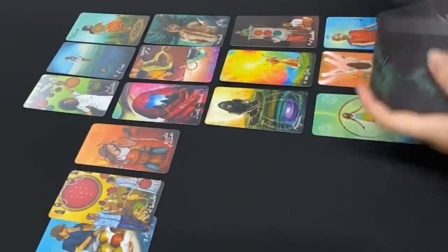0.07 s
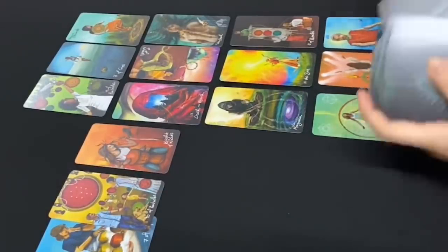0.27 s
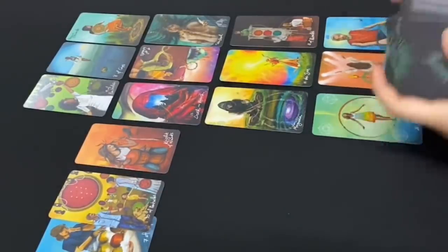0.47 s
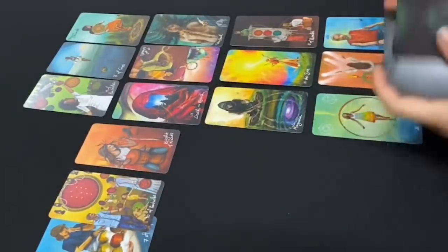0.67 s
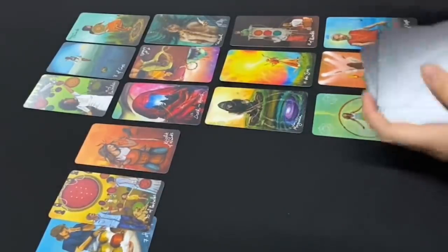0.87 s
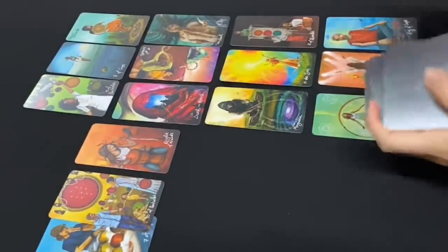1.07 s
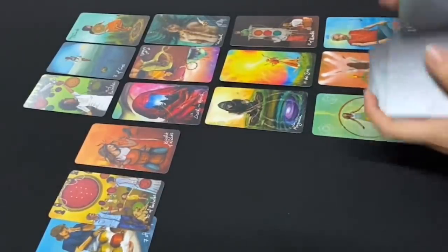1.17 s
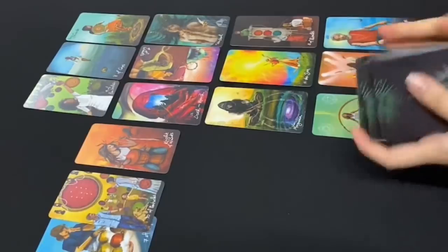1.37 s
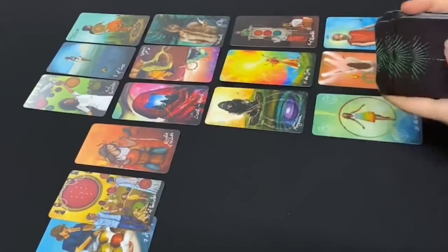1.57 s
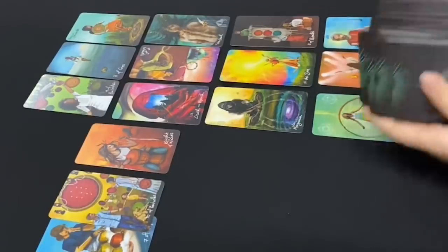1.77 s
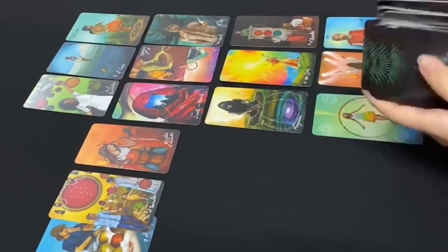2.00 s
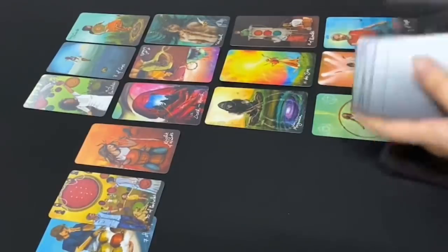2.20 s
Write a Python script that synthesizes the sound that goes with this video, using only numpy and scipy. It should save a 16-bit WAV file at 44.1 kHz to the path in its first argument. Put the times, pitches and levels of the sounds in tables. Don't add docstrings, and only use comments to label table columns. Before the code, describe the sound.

Close phone pickup of overhand card shuffling in a small quiet room: light hissing and ticks first, a sharp clustered crack at one second, softer rustling, then a woody pack thud and bright snaps.

```python
import sys
import numpy as np
from scipy import signal
from scipy.fft import rfft, irfft
from scipy.io import wavfile
from scipy.ndimage import uniform_filter1d

SR = 44100
rng = np.random.default_rng(int(sys.argv[2]) if len(sys.argv) > 2 else 0)


def ratio(d):
    e = np.asarray(d, float) / 20
    return 10 ** e


def unload_wav(signal):
    wavfile.write(
        sys.argv[1],
        SR,
        np.round(np.clip(np.atleast_2d(signal).T, -1, 1) * 32767).astype(np.int16),
    )


N = 98739

# f/Hz, level/dB
UPPER = [(6500, -35.5), (8000, -5.5), (9500, -3), (12500, 4), (15500, 2), (16300, -18)]
# f/Hz, level/dB
EDGE = [(700, -28), (1500, -12.5), (2600, -0.5), (4000, -3), (7000, -7), (9500, -17), (15500, -31.5)]


def evened(x):
    return x / np.sqrt(np.mean(x ** 2) + 1e-20)


def peaked(x):
    return x / abs(x).max()


def read(points, hz):
    f, value = np.transpose(points)
    return np.interp(np.log(hz + 1), np.log(f + 1), value)


def add(mix, s, sound):
    part = mix[round(s * SR):][:len(sound)]
    part += sound[:len(part)]


def tint(x, colour):
    return irfft(rfft(x) * ratio(read(colour, np.fft.rfftfreq(len(x), 1 / SR))), n=len(x))


def resonate(x, hz, width):
    turn = np.exp(2j * np.pi * hz * np.arange(len(x)) / SR)
    r = np.exp(-np.pi * width / SR)
    baseband = signal.lfilter([1 - r], [1, -r], x / turn)
    return 2 * (turn * baseband).real


def hiss(colour, patch_db):
    frames, hz = N // 128 + 5, np.fft.rfftfreq(512, 1 / SR)
    real, imag, patch = rng.standard_normal((frames, 257, 3)).T
    patch = uniform_filter1d(patch, size=8, axis=0)
    patch = evened(uniform_filter1d(patch, size=5, axis=1))
    z = (real + 1j * imag) * ratio(read(colour, hz)[:, None] + patch_db * patch)
    return evened(signal.istft(z, nperseg=512, noverlap=384)[1][:N])


def strokes(rows):
    slope_db, bend, grit_db = 20.5, 1.23, 2
    t, power = np.arange(N) / SR, np.zeros((2, N))
    for peak, rise, fall, db, second_db in rows:
        away = np.where(t < peak, (peak - t) / rise, (t - peak) / fall)
        drop = np.minimum(slope_db * away ** bend, 120)
        levels = np.array([[db], [db + second_db]])
        power += ratio(2 * (levels - drop))
    grit = evened(uniform_filter1d(rng.standard_normal(N), size=90))
    return np.sqrt(power) * ratio(grit_db * np.tanh(grit))


def slides():
    # peak t/s, rise/s, fall/s, level/dB, lower hiss relative level/dB
    glides = [(.04, 0.057, 0.026, -55, 7.5), (.095, 0.063, 0.048, -44.5, -3), (.2, 0.05, 0.021, -57, -2.5),
              (.243, 0.048, 0.046, -55, 5.5), (.31, 0.035, 0.14, -50, -2), (.366, 0.011, 0.051, -45.5, -4),
              (.462, 0.036, 0.021, -58.5, 1.5), (.53, 0.019, 0.014, -49, 6), (.6, 0.047, 0.032, -41, 0),
              (.78, 0.012, 0.071, -52, 2), (.81, 0.027, 0.03, -49, 2), (.846, 0.04, .04, -45.5, 5.5),
              (1.057, 0.017, 0.018, -39, 1.5), (1.29, 0.073, 0.074, -63, 4.5),
              (1.415, 0.033, 0.033, -58.5, 0.5), (1.56, 0.055, 0.058, -57, -0.5),
              (1.635, 0.11, 0.06, -52, -2), (1.745, 0.025, 0.064, -48, 2.5), (1.8, 0.046, 0.052, -48.5, -2),
              (1.893, 0.0095, 0.036, -48, 6), (2.012, 0.016, 0.023, -52.5, -5.5),
              (2.1, 0.047, 0.075, -54, 2), (2.14, 0.028, 0.15, -55.5, 6.5),
              (2.176, 0.017, 0.12, -49.5, 3.5)]
    # f/Hz, level/dB
    low_colour = [(2000, -28.5), (4400, -11), (5000, 1), (6800, 5.5), (8200, -0.5), (9500, -21.5)]
    upper, lower = strokes(glides)
    return upper * hiss(UPPER, 2.5) + lower * hiss(low_colour, 2.5)


def scrapes():
    # peak t/s, rise/s, fall/s, level/dB, dull part relative level/dB
    drags = [(.01, 0.067, 0.079, -60.5, -8), (.525, 0.022, 0.15, -49.5, -27),
             (.175, .03, 0.044, -77.5, 11.5), (.24, 0.046, 0.11, -67.5, -4),
             (.405, 0.019, 0.075, -75, 15.5), (.835, 0.042, 0.052, -46, -7.5),
             (.868, 0.024, 0.086, -70.5, 14), (1.034, 0.0034, .03, -65, 1), (1.058, 0.02, 0.009, -38, -2.5),
             (1.09, 0.034, 0.05, -43, -2.5), (1.3, 0.14, 0.064, -70, -19), (1.42, 0.059, 0.051, -69, -17),
             (1.485, 0.015, 0.02, -71, -2), (1.56, 0.088, 0.037, -68, -4), (1.8, 0.057, 0.019, -47, -22),
             (1.86, 0.061, 0.096, -46.5, -5), (2.062, 0.0055, 0.0079, -53.5, 17.5),
             (2.095, 0.052, 0.14, -54.5, 4), (2.14, 0.032, 0.068, -57, -8),
             (2.176, 0.0077, 0.026, -44, 2.5), (2.21, 0.023, 0.023, -40, -6)]
    dull_colour = [(150, -4), (500, 0.0), (1400, -4.5), (2500, -8.5), (6000, -36)]  # f/Hz, level/dB
    edge, dull = strokes(drags)
    return edge * hiss(EDGE, 2.2) + dull * hiss(dull_colour, 1.0)


def flicks():
    # t/s, peak level/dB, ring f/Hz, treble relative level/dB
    snaps = [(.172, -66, 1500, -20), (.229, -54, 2050, -10), (.239, -56, 1400, -20), (.243, -53, 2100, -20),
             (.263, -57.5, 1400, -20), (0.3201, -49, 5200, -8), (.321, -61, 1800, -20),
             (0.399, -51.5, 2100, -29), (0.4002, -45.5, 4700, -16), (.415, -62, 3000, -20),
             (0.5117, -30, 2700, -38), (.516, -38, 2400, -28), (0.6219, -41.5, 2050, -5),
             (.808, -35, 6700, -16), (.8206, -21, 5680, -39), (0.8208, -29, 2800, -30),
             (0.824, -30.5, 2700, -27), (0.8603, -28.5, 3030, -27), (0.86, -24.5, 6200, -18),
             (0.8613, -28.5, 1600, -37), (.866, -35, 1390, -30), (1.032, -40.5, 6220, -24),
             (1.045, -32, 5000, -21), (1.0493, -19.5, 6900, -17), (1.0528, -21, 2600, -33),
             (1.062, -31, 4800, -5), (1.063, -20.5, 2200, -17), (1.0725, -23.5, 7200, -12.5),
             (1.0738, -22.5, 5100, -20), (1.0787, -32, 3500, 6), (1.0817, -19, 2390, -36),
             (1.0815, -27.5, 6800, -20), (1.0944, -33, 2730, -1), (1.111, -32.5, 2700, -17),
             (1.484, -59, 2700, -31), (1.557, -65, 2300, -30), (1.815, -37, 7340, 11.5),
             (1.839, -17.5, 4860, -14), (1.8399, -22, 1493, -31), (1.869, -30, 3700, -25),
             (2.0621, -32.5, 1700, -21), (2.0757, -26, 6500, -21), (2.075, -28.5, 2480, -24),
             (2.0885, -27.5, 7000, 1.5), (2.092, -31, 1610, -25), (2.1315, -37, 2080, -34),
             (2.1833, -22, 6200, 2), (2.1881, -22, 7600, 7.5), (2.2085, -32.5, 3400, 0),
             (2.2163, -31, 7400, -8)]
    snap_s, ring_share, broad_db = 0.00053, 0.35, -3
    lead = 64
    out, t = np.zeros(N), np.arange(-lead, 448).clip(0) / SR
    bursts = rng.standard_normal((len(snaps), 3, 512)) * t * np.exp(-t / snap_s)
    for (s, db, hz, top_db), (a, b, c) in zip(snaps, bursts):
        width = hz * ring_share
        ring = peaked(resonate(resonate(a, hz, width), hz, width))
        broad = ratio(broad_db) * peaked(tint(b, EDGE))
        treble = ratio(top_db - 7.0) * peaked(tint(c, UPPER))
        add(out, s - lead / SR, ratio(db) * (ring + broad + treble))
    return out


def impacts(rows, rise, slap_db):
    out, t = np.zeros(N), np.arange(SR // 3) / SR
    for s, db, hz, t60 in rows:
        slap = np.sin(2 * np.pi * 2.15 * hz * t) + 2.8 * np.sin(2 * np.pi * 3.5 * hz * t)
        ring = np.sin(2 * np.pi * hz * t) * ratio(-60 * (t / t60) ** 0.9)
        ring += ratio(slap_db - 60 * t / 0.013) * slap
        onset = np.sin(np.pi / 2 * np.minimum(t * abs(hz) / rise, 1)) ** 2
        add(out, s, ratio(db) * onset * ring)
    return out


def cracks():
    # t/s, peak level/dB, ring f/Hz, t60/s
    hits = [(.5127, -25.5, 2720, 0.011), (.8208, -20, 2780, 0.0032), (.8606, -17, 3140, 0.0028),
            (1.0486, -4.5, 3560, 0.0032), (1.0488, -18.5, 5480, 0.0092), (1.0489, -13.5, 1700, 0.0063),
            (1.8378, -22.5, 3040, 0.0055), (2.0835, -30, 2280, .008), (1.0815, -19, 3500, 0.002),
            (1.0486, -11.5, 4470, 0.0054), (2.0752, -21.5, 6560, 0.0057), (2.1832, -19, 1684, 0.016),
            (2.2028, -33, 1960, 0.0042), (2.2122, -26, 1500, 0.0046), (2.2165, -20, 955, 0.0065)]
    return impacts(hits, 0.59, -66.5)


def knocks():
    # t/s, peak level/dB, ring f/Hz,
    # t60/s
    hits = [(.3992, -38.5, 830, 0.022), (.6175, -47, 456, 0.041), (.617, -41.5, 627, 0.021),
            (.622, -44.5, 976, 0.03), (.821, -42.5, 520, 0.059), (.826, -41, 664, 0.03),
            (.861, -45, 642, 0.09), (.866, -41, 446, 0.024), (1.083, -38, 833, 0.015),
            (1.786, -42.5, 590, 0.035), (1.799, -46.5, 628, 0.066), (1.838, -33.5, 522, 0.041),
            (1.839, -46, 215, 0.13), (1.999, -26.5, 280, 0.01), (2.0027, -13.5, 412, 0.017),
            (2.0078, -18.5, 320, 0.029), (2.0052, -18.5, 440, 0.012), (2.0093, -23, 1530, 0.0056),
            (2.0155, -30, 1650, 0.0073), (2.0195, -46, 1740, 0.0073), (2.0118, -20.5, 330, 0.03),
            (2.0155, -6.5, 429, 0.012), (2.0215, -15.5, 281, 0.046), (2.0243, -11, 492, 0.022),
            (2.0266, -6.5, 432, 0.01), (2.183, -19.5, 350, 0.011), (2.1834, -22.5, 960, 0.021),
            (2.1935, -25, 164, 0.058), (2.1985, -22.5, 134, 0.035), (2.203, -20.5, 372, 0.0071),
            (2.212, -29, 466, 0.023)]
    return tint(impacts(hits, 0.22, -25.0), [(1900, 2), (2600, -5), (5000, -24)])


def thumps():
    # t/s, peak level/dB, f/Hz, t60/s
    pulses = [
        (.93, -27, 19, 0.15),
        (1.082, -26, 69, 0.03),
        (1.086, -22, -9, 0.28),
        (2.003, -27.5, 207, 0.14),
        (2.004, -44, 26, 0.65),
        (2.025, -30.5, 93.5, 0.46),
        (2.187, -34, 30, 0.5),
        (2.192, -28, 98.5, 0.4),
        (2.06, -34, 92, 0.22),
    ]
    return impacts(pulses, 0.6, -27.0)


def room(x):
    # f/Hz, t60/s
    decay = [(200, 0.1), (3000, 0.23), (8000, 0.17), (14000, 0.18)]
    turns_per_s = 110
    taps = np.zeros((3, SR // 2))
    at = np.arange(80, SR // 2 - 20, 20)
    places = at + rng.integers(0, 20, (3, len(at)))
    np.put_along_axis(taps, places, rng.choice([-1., 1.], (3, len(at))), 1)
    hz, t, z = signal.stft(taps, SR, nperseg=256)
    z = z * ratio(-60 * t / read(decay, hz)[:, None])
    tail = signal.istft(z, SR, nperseg=256)[1]
    phase = turns_per_s * np.arange(N) / SR + np.arange(3)[:, None] / 3
    turn = np.sqrt(2 / 3) * np.cos(2 * np.pi * phase)
    return signal.fftconvolve(x * turn, tail / np.linalg.norm(tail[0]), axes=1).sum(0)[:N]


def floor():
    # f/Hz, level/dB
    tone_colour = [(15, 6), (67, -8.5), (300, -14.5), (1000, -22.5), (7500, -45.5), (10000, -52),
                   (14000, -41), (16500, -52)]
    # f/Hz, bandwidth/Hz, level/dB
    hums = [
        (96.9, 13, -75),
        (247.4, 16, -76.5),
    ]
    t = np.arange(N) / SR
    tone = ratio(-51.5 - 9.5) * evened(tint(rng.standard_normal(N), tone_colour))
    rumble = resonate(resonate(rng.standard_normal(N), 14.9, 5.7), 15, 28)
    out = tone + ratio(-62.5) * evened(rumble)
    for hz, width, db in hums:
        waver = evened(resonate(resonate(rng.standard_normal(N), hz, width), hz, width))
        out += ratio(db) * (waver + 1.86 * np.sin(2 * np.pi * hz * t))
    return out


def scene():
    cards = slides() + scrapes() + flicks() + cracks()
    pack = knocks()
    wet = room(ratio(-11.5) * cards + ratio(-14) * pack)
    return (cards + pack + wet + thumps() + floor())[None]


def top_cut(x):
    return signal.sosfilt(signal.butter(12, 16650, fs=SR, output="sos"), x)


def record(dry):
    soft = signal.oaconvolve(dry, signal.firwin(255, 16300, fs=SR)[None], "same")
    return top_cut(soft)


dry = scene()
out = record(dry)
unload_wav(out)
```